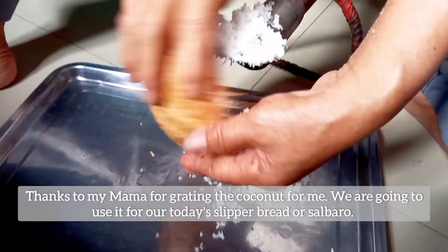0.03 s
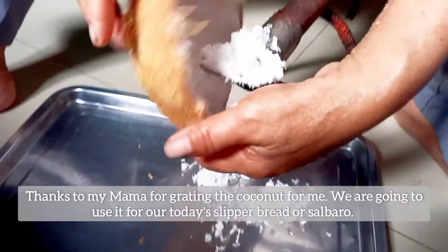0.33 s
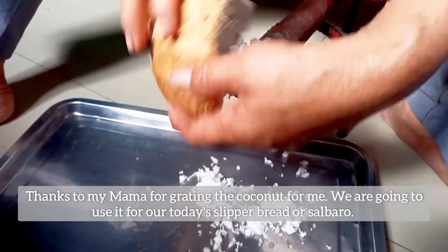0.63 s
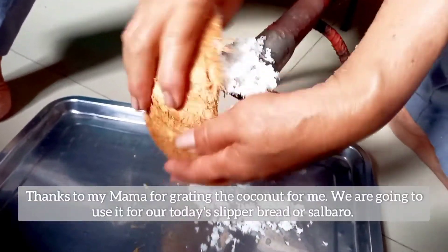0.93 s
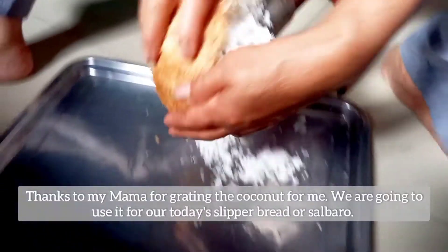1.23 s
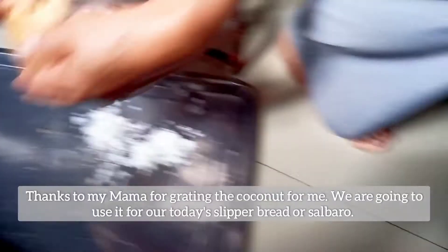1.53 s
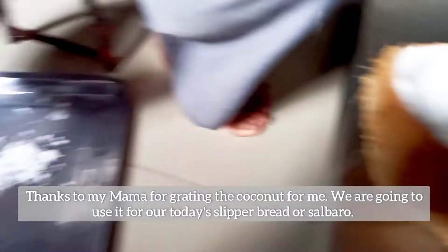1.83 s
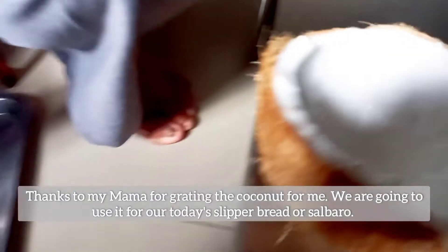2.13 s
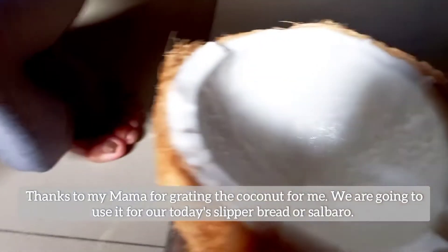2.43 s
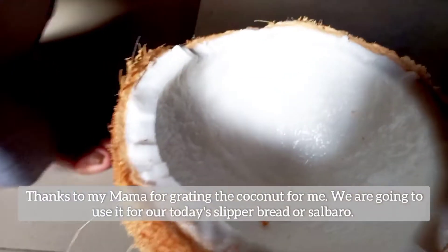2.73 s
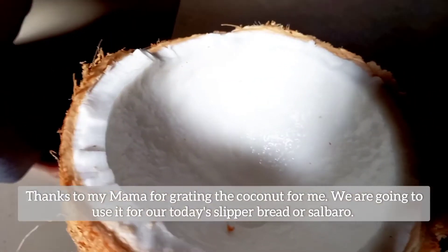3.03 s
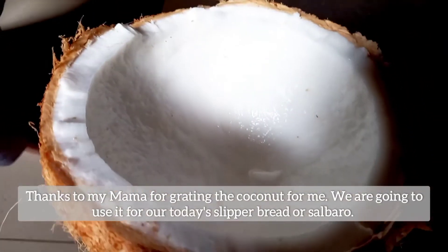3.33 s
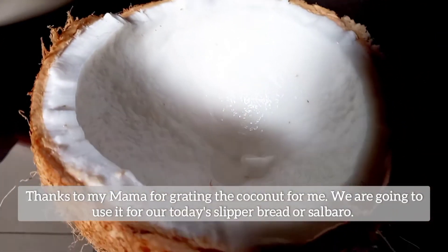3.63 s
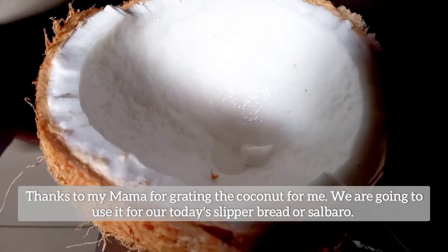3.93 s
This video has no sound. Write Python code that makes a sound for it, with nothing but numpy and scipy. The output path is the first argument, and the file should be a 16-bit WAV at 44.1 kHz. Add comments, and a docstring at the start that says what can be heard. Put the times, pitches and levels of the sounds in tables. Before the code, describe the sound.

Coconut is scraped on a metal grater in a small kitchen. One stroke fades at the start; from about 0.8 seconds, rasping strokes repeat nearly three times a second until the end. Something rubs on the microphone from 1.5 to 1.9 seconds. From 2.2 seconds the teeth catch with sharp, ringing clicks, strongest around 2.3 and 2.7. A faint low rumble and wavering hum lie underneath.

```python
"""Half a coconut is pushed over a toothed metal grater, nearly three strokes a second, in a small
tiled kitchen. The teeth tear the flesh in tiny snaps that ring the blade and the hollow shell.
A low rumble with a wavering hum lies underneath; two faint squeaks fall between strokes.
Midway, something rubs over the microphones as they swing away."""
import sys
import numpy as np
from scipy import signal
from scipy.fft import rfft, irfft
from scipy.io import wavfile
from scipy.ndimage import uniform_filter1d

SR = 44100
rng = np.random.default_rng(int(sys.argv[2]) if len(sys.argv) > 2 else 0)


def master(y):
    """Save y as 16-bit WAV."""
    cut = np.clip(np.atleast_2d(y).T, -1, 1)
    pcm = np.round(cut * 32767)  # scale
    wavfile.write(sys.argv[1], SR, pcm.astype(np.int16))


N = 176400
T = np.arange(N) / SR

# pushes over the grater: start_s, rise_s, fall_s, scrape_db, blade_db, shell_db
STROKES = [(-.15, 0.085, 0.14, -34, -37.5, -31.5), (0.751, 0.074, 0.12, -26.5, -31, -30.5),
           (1.115, 0.063, 0.14, -26, -28.5, -33), (1.473, 0.081, 0.11, -25, -32, -28.5),
           (1.853, 0.046, 0.16, -23, -27.5, -32), (2.231, 0.083, 0.096, -22.5, -20.5, -34.5),
           (2.6, 0.07, 0.12, -22.5, -21, -30.5), (2.956, 0.092, 0.11, -27.5, -27, -35.5),
           (3.325, 0.096, 0.11, -26, -26, -39), (3.688, 0.082, 0.12, -29.5, -31, -36.5)]
# a tooth catches and lets go: time_s, level_db
CATCHES = [(1.153, -30), (2.26, -27), (2.303, -17.5), (2.324, -19), (2.358, -23), (2.605, -45),
           (2.625, -25.5), (2.654, -16.5), (2.681, -21), (2.978, -42.5), (3.005, -27), (3.383, -24),
           (3.758, -19.5), (3.791, -21)]
# faint brushing between strokes: centre_s, half_length_s, level_db
BRUSHES = [(0.345, 0.053, -61), (0.733, 0.042, -51.5), (1.108, 0.036, -51.5), (1.326, 0.088, -58.5)]
# tearing flesh, low band: freq_hz, relative_db
RASP_SPECTRUM = [(100, -38), (300, -8.5), (480, -5.5), (600, -1.5), (1200, 0.5), (1450, -1), (1660, -1),
                 (1800, -10.5), (2200, -10.5), (2650, -13.5), (3000, -6), (6000, -19.5)]
# tearing flesh, high band: freq_hz, relative_db
FIZZ_SPECTRUM = [(900, -26), (2300, -16), (2800, -2.5), (4000, -2), (4900, -4.5), (5900, 2.5), (6850, 1.5),
                 (7400, -7), (8300, -13), (10200, -8.5), (10700, -2), (13000, -6.5), (15600, -3)]
# rasp against fizz: time_s, offset_db
RASP_BALANCE = [(2.7, -1.5), (3.8, -4.5)]
# blade resonances: freq_hz, width_hz, gain_db
BLADE_MODES = [(2517.5, 61, -1.5), (2583, 83, -14.5), (2710, 70, -23.5), (2284, 120, -13.5),
               (3880, 100, -19), (4450, 63.7, -20.5), (5062, 38, -16), (5968, 80, -26.5), (6390, 90, -11),
               (6850, 35, -28.5)]
# hollow shell resonances: freq_hz, width_hz, gain_db
SHELL_MODES = [(399.5, 18, 5), (878.5, 25, -4.5), (1583, 110, -4.5)]
# shell moves left as the microphones turn: time_s, left_minus_right_db
SHELL_PAN = [(1.3, -6.5), (2.2, 9.5)]
# kitchen echo: freq_hz, t60_s
ROOM_DECAY = [(200, 0.52), (700, 0.3), (2500, 0.29), (6500, 0.32), (14000, 0.24)]
# low rumble: freq_hz, relative_db
RUMBLE_SPECTRUM = [(25, -14), (55, 5), (85, -3), (145, 5), (185, -5.5), (230, 3.5), (360, -2.5),
                   (480, -14.5), (750, -18), (1100, -27.5), (5000, -54)]
# rumble envelope: time_s, level_db
RUMBLE_LEVEL = [(0, -37), (.3, -45.5), (.5, -45.5), (.7, -41), (1.4, -43), (2.3, -49), (3.15, -45),
                (4, -44.5)]
# hum contour: time_s, pitch_hz, level_db
HUM_TRACK = [(0, 164.3, -38), (.3, 134.8, -45), (.44, 154.4, -42.5), (.57, 147.2, -36.5),
             (.625, 150, -30.5), (.71, 148.8, -37), (1.3, 137, -43), (2.4, 146, -53.5), (3.85, 147.5, -45)]
# faint hiss: freq_hz, relative_db
HISS_SPECTRUM = [(2400, 9.5), (3300, -14), (6800, 10.5), (7900, -17), (11000, -5), (15500, -5.5)]
# faint squeaks: centre_s, half_length_s, pitch_hz, level_db
SQUEAKS = [(0.667, 0.063, 4450, -60.5), (3.645, 0.096, 3340, -61.5)]
# rubbing on the microphones: time_s, body_db, treble_db
RUB_LEVELS = [(1.5, -64, -63), (1.55, -30, -44), (1.622, -30, -29.5), (1.635, -20.5, -18),
              (1.66, -21, -18.5), (1.745, -18, -23), (1.782, -23.5, -25.5), (1.808, -19, -25.5),
              (1.835, -23.5, -29.5), (1.87, -29, -35), (1.99, -76, -95)]
# rub, low band: freq_hz, relative_db
RUB_BODY_SPECTRUM = [(60, -27.5), (300, -16), (470, -5), (650, 0), (1850, -7), (4000, -15.5), (8000, -38.5)]
# rub, high band: freq_hz, relative_db
RUB_TREBLE_SPECTRUM = [(700, -11.5), (2000, 3.5), (4200, 7), (5200, 1.5), (6400, 5.5), (8200, -14),
                       (11000, -4.5), (15600, -6.5)]
# low swells of the rumble: centre_s, half_length_s, level_db
SWELLS = [(2.313, 0.24, -41.5), (3.486, 0.22, -44), (3.77, 0.15, -38.5)]


def amp(db):
    """Decibels to gain."""
    return 10 ** (np.asarray(db) / 20)


def unit(x):
    """Scale to rms 1."""
    return x / np.sqrt(np.mean(x ** 2) + 1e-20)


def at_freq(table, hz):
    """Interpolate a table over log frequency."""
    freq_hz, value = np.transpose(table)
    return np.interp(np.log(hz + 1), np.log(freq_hz + 1), value)


def curves(table):
    """Each column of a time table, per sample."""
    time_s, *columns = np.transpose(table)
    return [np.interp(T, time_s, column) for column in columns]


def convolve(x, response):
    """Filter one or two channels."""
    return signal.fftconvolve(np.atleast_2d(x), np.atleast_2d(response), axes=1)[:, :N]


def min_phase(log_gain):
    """Causal spectrum for a log magnitude."""
    return np.exp(np.conj(signal.hilbert(log_gain)))


def colour(x, spectrum, size=4096):
    """Shape the spectrum; keeps the power of white input."""
    log_gain = np.log(amp(at_freq(spectrum, abs(np.fft.fftfreq(size, 1 / SR)))))
    response = np.fft.ifft(min_phase(log_gain)).real[:size // 2]
    return convolve(x, response / np.linalg.norm(response))


def ring(x, hz, width_hz):
    """One damped mode; keeps the power of white input."""
    t = T[:SR // 5]
    response = np.exp(-np.pi * width_hz * t) * np.sin(2 * np.pi * hz * t)
    return convolve(x, response / np.linalg.norm(response))


def wander(hz):
    """Smooth random drift up to hz, rms 1."""
    rolloff = 1 + (np.fft.rfftfreq(N, 1 / SR) / hz) ** 4
    return unit(irfft(rfft(rng.standard_normal(N)) / rolloff, N))


def phase_rad(hz):
    """Running phase of a varying frequency."""
    return 2 * np.pi * np.cumsum(hz) / SR


def pan(db):
    """Constant-power gains for a left-minus-right level."""
    ratio = amp(np.atleast_1d(db))
    return np.array([ratio, np.ones_like(ratio)]) * np.sqrt(2 / (1 + ratio ** 2))


def bump(centre_s, half_s):
    """Cosine swell, peak 1."""
    return np.cos(np.pi / 2 * np.clip((T - centre_s) / half_s, -1, 1))


def snaps(per_s, spread_db):
    """Dense tiny clicks of uneven size, rms 1."""
    size = amp(spread_db * np.minimum(rng.exponential(1, N), 4))
    return unit(size * rng.choice([-1, 1], N) * (rng.random(N) < per_s / SR))


def push(start_s, rise_s, fall_s, touch_half_s=0.029, touch_db=-30):
    """Stroke envelope: a light scratch as flesh meets teeth, then swell and release."""
    up = np.clip((T - start_s) / rise_s, 0, 1)
    down = np.clip((start_s + rise_s + fall_s - T) / fall_s, 0, 1)
    swell = np.sin(np.pi / 2 * up) ** 2.23 * np.sin(np.pi / 2 * down) ** 2.64
    return swell + amp(touch_db) * bump(start_s + touch_half_s / 2, touch_half_s)


def plate(x, count=150, range_hz=(2811, 14935), width_hz=50, mix_db=-5.5):
    """Add the faint, close upper modes of the steel."""
    t = T[:SR // 10]
    hz = rng.uniform(*range_hz, (count, 1))
    phase = rng.uniform(0, 2 * np.pi, (count, 1))
    response = np.exp(-np.pi * width_hz * t) * np.sin(2 * np.pi * hz * t + phase).sum(0)
    ringing = convolve(x, response / np.linalg.norm(response))
    return (x + amp(mix_db) * ringing) / np.sqrt(1 + amp(mix_db) ** 2)


def grating(judder_db=1.5, catch_decay_s=0.0042, catch_rasp_db=-14.5):
    """Teeth tear flesh in juddering snaps that ring blade and shell; catches kick the blade."""
    fizz, rasp, blade, shell, kicks = np.zeros((5, N))
    rasp_offset_db, = curves(RASP_BALANCE)
    for start_s, rise_s, fall_s, scrape_db, blade_db, shell_db in STROKES:
        force = push(start_s, rise_s, fall_s)
        fizz += force * amp(scrape_db)
        rasp += force * amp(scrape_db + rasp_offset_db)
        blade += force * amp(blade_db)
        shell += force * amp(shell_db)
    for time_s, db in CATCHES:
        kicks[round(time_s * SR)] = amp(db) * np.sqrt(catch_decay_s * SR)
        rasp += amp(db + catch_rasp_db) * (T >= time_s) * np.exp(-abs(T - time_s) / catch_decay_s)
    for centre_s, half_s, db in BRUSHES:
        fizz += bump(centre_s, half_s) * amp(db)
    judder = unit(amp(judder_db * wander(hz=133)))
    tearing, left, right = [judder * snaps(per_s=9000, spread_db=3) for _ in range(3)]
    out = colour(plate(fizz * np.array([left, right])), FIZZ_SPECTRUM)
    out += colour(rasp * tearing, RASP_SPECTRUM)
    blade_drive = blade * tearing + kicks
    shell_drive = shell * tearing * pan(*curves(SHELL_PAN))
    for drive, modes in ((blade_drive, BLADE_MODES), (shell_drive, SHELL_MODES)):
        for hz, width_hz, db in modes:
            out += amp(db) * ring(drive, hz, width_hz)
    return out


def kitchen(x, echo_db=-4, bounce_db=1, bounce_decay_s=0.0074, right_lag_s=0.00045,
            shared_below_hz=600, even_band_hz=90):
    """Direct sound, quick bounces off tray and floor, and wall echo."""
    length = SR // 2
    taps = rng.choice([-1., 1.], (2, length)) * (rng.random((2, length)) < 4000 / SR)
    hz, t, frames = signal.stft(taps, SR, nperseg=256)
    t60_s = at_freq(ROOM_DECAY, hz)[:, None]
    response = signal.istft(frames * amp(-60 * t / t60_s) / np.sqrt(t60_s), SR, nperseg=256)[1]
    response *= amp(echo_db) / np.linalg.norm(response, axis=1, keepdims=True)
    bounces = taps * np.exp(-T[:length] / bounce_decay_s)
    response[:, :length] += amp(bounce_db) * bounces / np.linalg.norm(bounces, axis=1, keepdims=True)
    response[0, 0] += 1  # direct path
    response[1, round(right_lag_s * SR)] += 1
    spectrum = np.fft.fft(response, SR)  # 1 Hz bins
    shared = 1 / (1 + (np.fft.fftfreq(SR, 1 / SR) / shared_below_hz) ** 6)  # same bass on both sides
    spectrum[1] = shared * spectrum[0] + (1 - shared) * spectrum[1]
    power = uniform_filter1d(abs(spectrum) ** 2, even_band_hz, mode="wrap")
    log_gain = uniform_filter1d(np.log(power) / 2, even_band_hz, mode="wrap")
    flattened = spectrum / min_phase(log_gain)
    return convolve(x, np.fft.ifft(flattened).real[:, :length])


def rumble(throb_hz=21.23, throb_depth=0.16, correlation=0.81):
    """Low throbbing noise, mostly common to both channels."""
    level_db, = curves(RUMBLE_LEVEL)
    throb = 1 + throb_depth * np.cos(phase_rad(throb_hz * (1 + 0.0806 * wander(hz=3.3))))
    common = np.sqrt(correlation) * rng.standard_normal(N)
    separate = np.sqrt(1 - correlation) * rng.standard_normal((2, N))
    return colour((common + separate) * throb * amp(level_db), RUMBLE_SPECTRUM)


def hum(pitch_waver=0.01, waver_db=1.1, fifth_db=-12.5):
    """Wavering low tone with a weaker partial a fifth above."""
    pitch_hz, level_db = curves(HUM_TRACK)
    phase = phase_rad(pitch_hz * (1 + pitch_waver * wander(hz=16.7)))
    tone = np.sin(phase) + amp(fifth_db) * np.sin(3 / 2 * phase)
    return amp(level_db + waver_db * wander(hz=9.8)) * tone


def hiss(level_db=-63.5):
    """Faint, steady high noise."""
    return amp(level_db) * colour(rng.standard_normal((2, N)), HISS_SPECTRUM)


def squeaks(width_hz=400):
    """Thin swells of narrow-band noise between strokes."""
    out = np.zeros((1, N))
    for centre_s, half_s, hz, db in SQUEAKS:
        band = ring(rng.standard_normal(N), hz, width_hz)
        out += amp(db) * bump(centre_s, half_s) * unit(ring(band, hz, width_hz))
    return out


def rub(grip_db=0.81, apart_above_hz=724):
    """Close, dry friction on the microphones; they share only some of its low body."""
    body_db, treble_db = curves(RUB_LEVELS)
    grip = unit(amp(grip_db * wander(hz=150)))
    grains = grip * np.array([snaps(per_s=12000, spread_db=1.0) for _ in range(2)])
    side = signal.sosfilt(signal.butter(1, apart_above_hz, "high", fs=SR, output="sos"), grains[1])
    body = unit(np.array([grains[0] + side, grains[0] - side]))
    treble = colour(grains * amp(treble_db), RUB_TREBLE_SPECTRUM)
    return colour(body * amp(body_db), RUB_BODY_SPECTRUM) + treble


def swells(pitch_hz=87, spread_hz=16.8):
    """Brief booms of an unsteady bass tone."""
    boom = np.sin(phase_rad(pitch_hz + spread_hz * wander(hz=29.2)))
    return boom * sum(amp(db) * bump(centre_s, half_s) for centre_s, half_s, db in SWELLS)


def scene():
    """Grater in the kitchen, close rub, and a background with its bass to the right."""
    foreground = kitchen(grating() + squeaks()) + rub()
    return foreground + (rumble() + hum()) * pan(db=-2.0) + swells() * pan(db=-6.5) + hiss()


def record(dry, bass_cut_hz=70, band_limit_hz=15850):
    """Bass cut and steep band limit."""
    thinned = signal.sosfilt(signal.butter(2, bass_cut_hz, "high", fs=SR, output="sos"), dry)
    lowpass = signal.firwin(511, band_limit_hz, window=("kaiser", 9), fs=SR)
    return signal.oaconvolve(thinned, lowpass[None], "same")


dry = scene()
out = record(dry)
master(out)
```